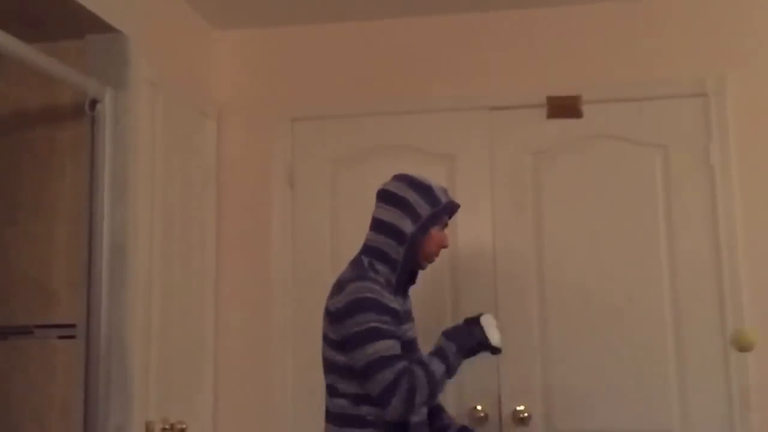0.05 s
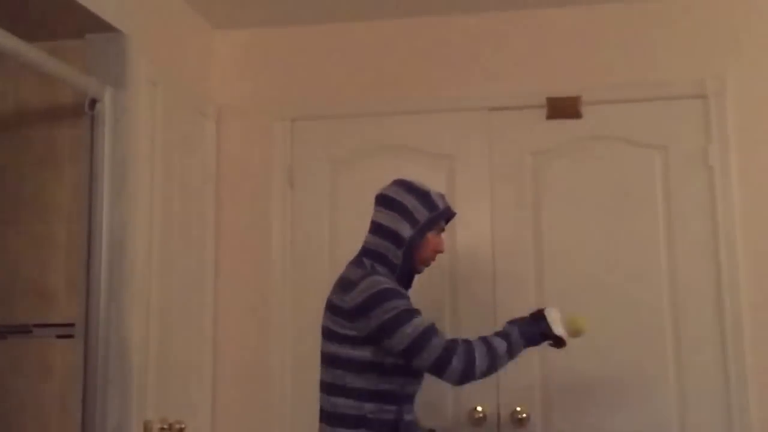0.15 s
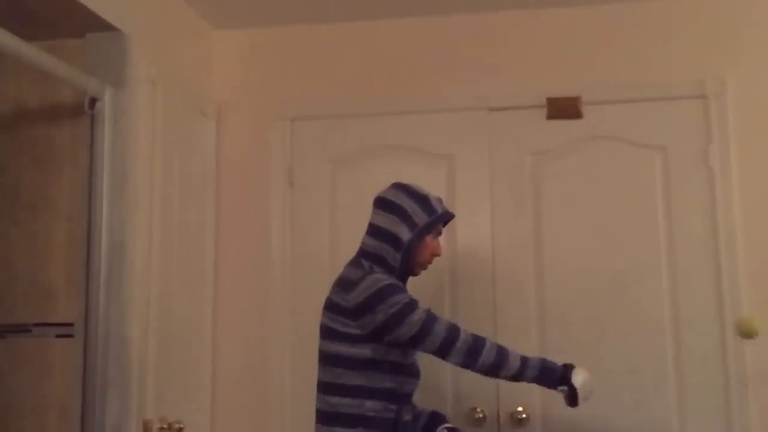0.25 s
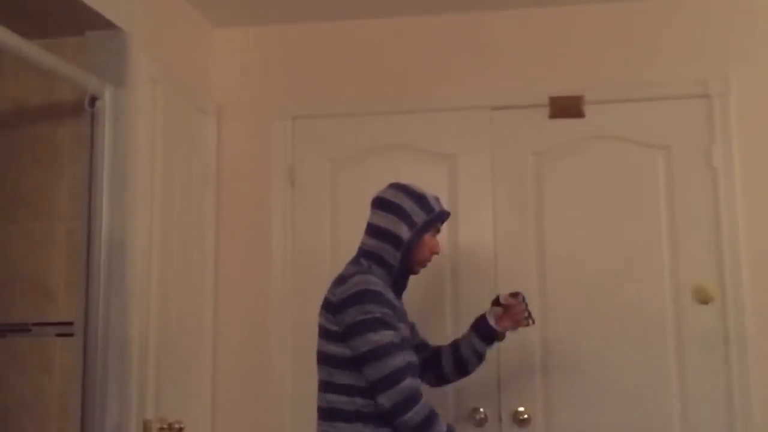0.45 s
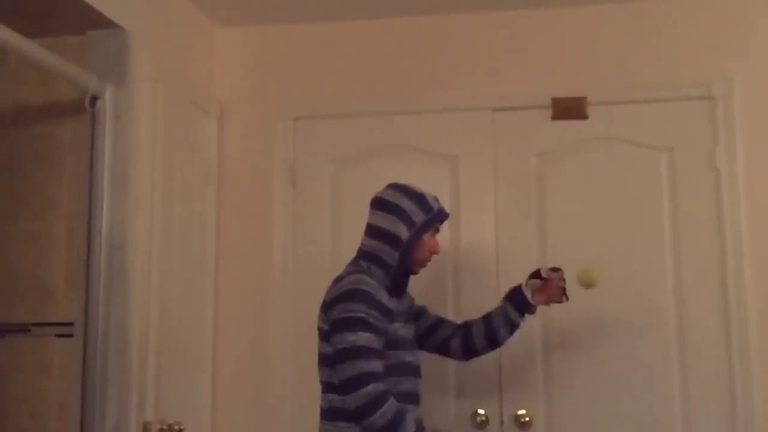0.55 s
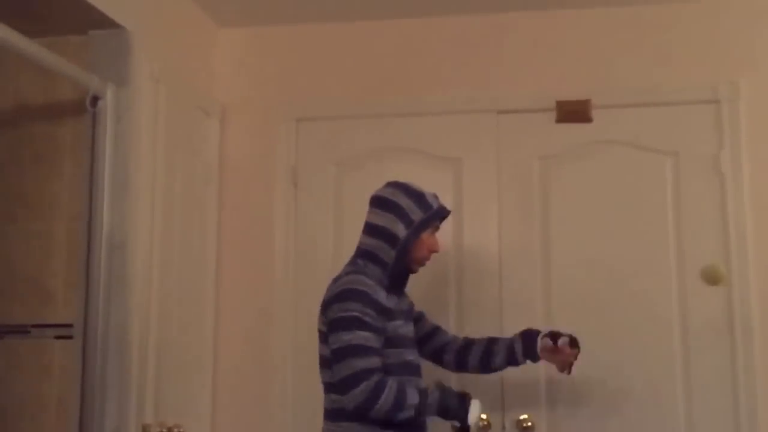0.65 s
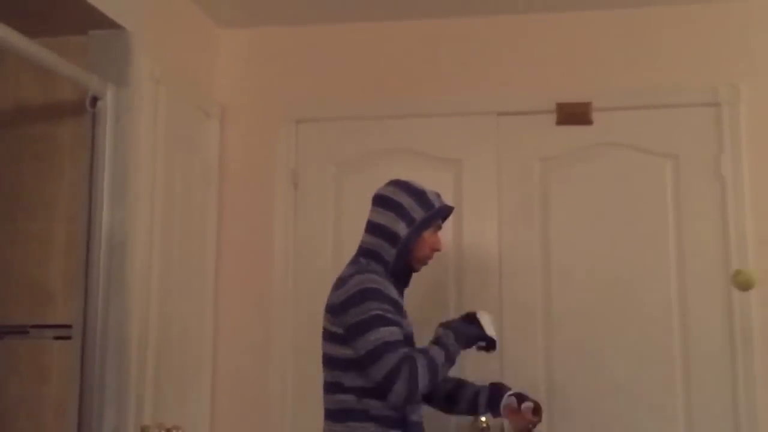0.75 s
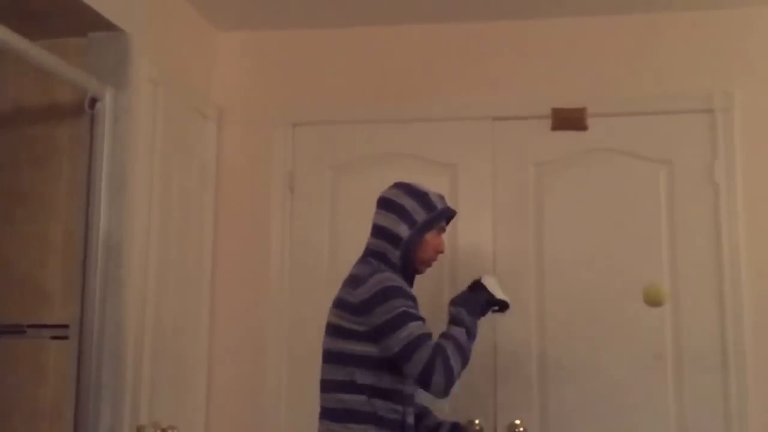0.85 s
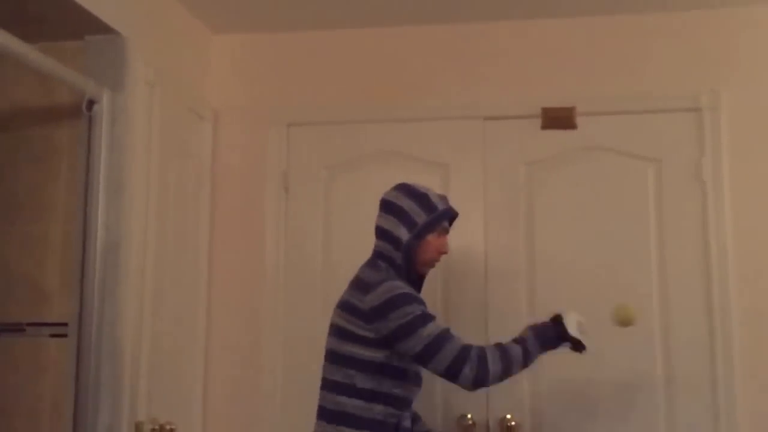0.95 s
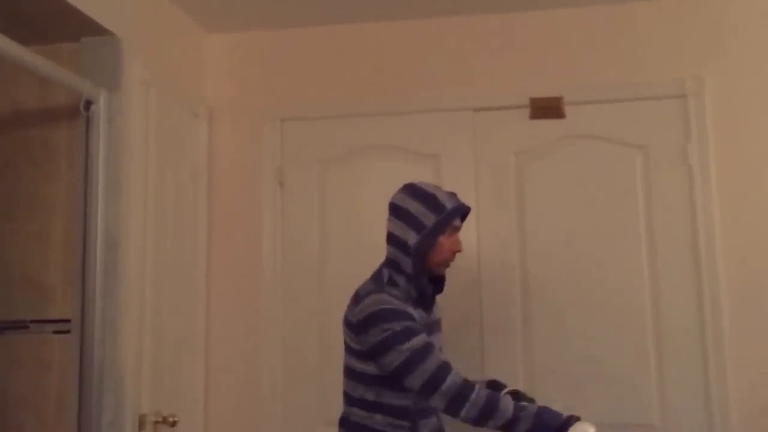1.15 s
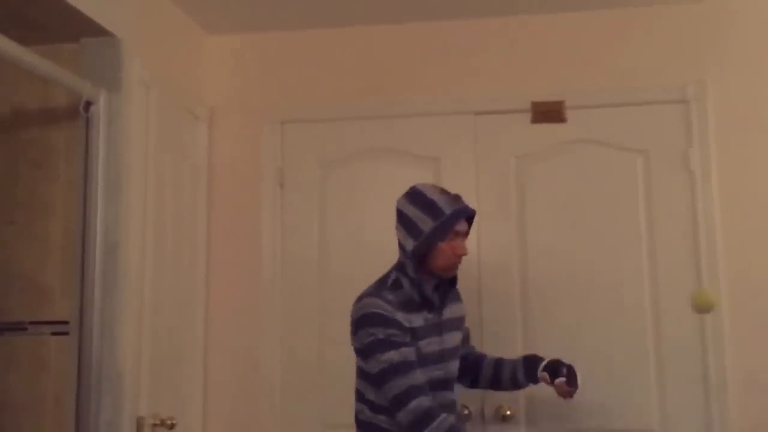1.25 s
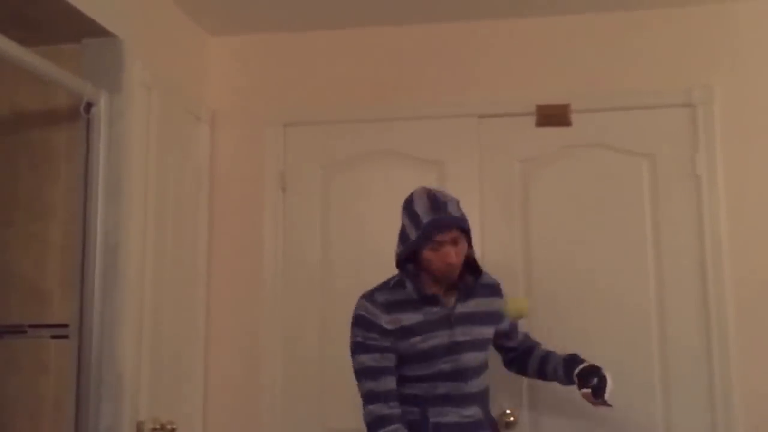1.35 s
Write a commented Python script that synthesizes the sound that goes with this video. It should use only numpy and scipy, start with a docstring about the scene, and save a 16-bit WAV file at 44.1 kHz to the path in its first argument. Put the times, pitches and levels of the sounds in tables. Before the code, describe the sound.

Gloved fists punch a small ball on an elastic cord at about 0.2, 0.6 and 1.0 seconds, the first hit brightest. Each is a leathery slap and dull thump, followed by a short boom and thin ring in a small bare room. The ball swishes faintly near 0.5 and 1.2 seconds. Sleeves rustle very softly, and feet shift around 1.2 seconds over a faint room hum.

```python
"""Gloved fists punch a small ball on an elastic cord, about every 0.4 s, in a small bare room.
Each punch is a leather slap, coloured by the hollow of the glove, and a dead thump from the ball;
it sets the room's low modes booming and leaves a thin ring. Around the punches sleeves rustle,
gloves tick and creak, feet shift and the ball swishes on its cord, over a faint hum of the room."""
import sys
import numpy as np
from scipy import signal
from scipy.fft import rfft, irfft
from scipy.io import wavfile
from scipy.ndimage import uniform_filter1d, map_coordinates

SR = 44100
rng = np.random.default_rng(int(sys.argv[2]) if len(sys.argv) > 2 else 0)


def bounce(signal):
    """Save signal as a 16-bit WAV file at the path given by the first command-line argument."""
    frames = np.transpose(np.atleast_2d(signal))
    limited = np.clip(frames, -1, 1)
    pcm = np.round(limited * 32767).astype(np.int16)
    wavfile.write(sys.argv[1], SR, pcm)


N = 61739
T = np.arange(SR) / SR  # one second for a hit to ring out
HZ = np.fft.rfftfreq(2 * SR, 1 / SR)  # every EQ curve is drawn on this grid

# The blows; the first has already landed and only rings out. Each row: start in seconds, boom gain in dB,
# boom tilt in dB per octave, ring gain in dB, glove cavity in Hz, its gain in dB, then five EQ gains
# in dB for the slap: thud, knock, smack, crack, snap. The thud gain also drives the ball's thump.
PUNCHES = [(-.165, -3, 12, 7, 440, -12.5, 9.5, 10, 1, 5, -1),
           (0.2126, 3, 2.5, 5, 676, 11.5, 6.5, -0.5, -1, 3.5, -0.5),
           (0.5916, -1, -3.5, 5, 956, 2.5, -3, -2, -1.8, -1, -9.5),
           (0.9818, 1.5, -3, 1, 569, 11, 1, 1.5, -1, -4.5, -1)]
# Where thud, knock, smack, crack and snap sit, in Hz.
SLAP_BANDS_HZ = [280, 600, 1200, 3600, 7000]
# The tone of glove on ball. Each row: frequency in Hz, gain in dB.
SLAP_EQ = [(25, -21.5), (60, 3), (150, 14), (260, 12.5), (400, 8), (520, 3.5), (720, 2), (950, 10.5),
           (1200, 15.5), (1650, 9.5), (2250, 9.5), (2900, 0.5), (4200, 0), (5600, -8), (9000, -13.5),
           (15500, -25.5)]
# The ball's dead thump. Each row: pitch in Hz, level in dB, time to fall 60 dB in seconds.
THUMP_MODES = [(200, -26, .04), (370, -28, .035)]
# Tones that ring on after the slap. Each row: pitch in Hz, level in dB, time to fall 60 dB in seconds.
RING_MODES = [(551, -56, .38), (595, -55, .38), (677, -57, .34), (890, -49, .4), (946, -47, .4),
              (1062, -39.5, .47), (1176, -42, .38), (1205, -37, .36), (1240, -43, .38), (1305, -47, .52),
              (1493, -51, .45), (1596, -51, .4), (1712, -50, .35), (2036, -49, .3), (2207, -50, .33),
              (2410, -52, .3)]
# The room's low modes. Each row: pitch in Hz, level in dB, time to fall 60 dB in seconds.
BOOM_MODES = [(54.7, -54.5, 0.51), (79.7, -37.5, 0.248), (93.5, -41, 0.33), (120, -39.5, 0.42),
              (142.06, -32, 0.39), (160.5, -30, 0.41), (186.8, -32.5, 0.45), (206.5, -37, 0.4),
              (242.3, -44.5, 0.37), (289.5, -38, 0.52), (326, -43, 0.46), (363.2, -49.5, .26)]
# The room's reverb time. Each row: frequency in Hz, time to fall 60 dB in seconds.
ROOM_DECAY = [(60, 0.39), (200, 0.57), (550, 0.44), (1200, 0.63), (2200, 0.42), (4000, 0.4), (7000, .31),
              (14000, .25)]
# The room's hum. Each row: frequency in Hz, relative level in dB.
HUM_EQ = [(20, -17), (50, -2), (140, 7), (300, -8), (700, -8), (1200, -32), (2500, -17.5), (6000, -18.5),
          (15500, -27.5)]
# Sleeve moves. Each row: peak time in seconds, width in seconds, level in dB.
RUSTLES = [(.08, 0.071, -65), (0.207, 0.0057, -55), (.9, 0.057, -72.5), (1.384, 0.032, -61)]
# The tone of cloth. Each row: frequency in Hz, relative level in dB.
CLOTH_EQ = [(100, 12), (500, -2), (1500, 0), (3500, -6), (8000, -15), (15000, -11)]
# Glove clicks. Each row: start in seconds, gain in dB, treble tilt in dB per octave, direct sound in dB.
TICKS = [(.055, -32, 1, -12), (.2114, -19, 0, 1), (.2143, -19, 0, -1.5), (.5987, -25, 3.5, -3),
         (.9682, -26, 0, -10), (.9812, -23, 0, -2.5), (.9842, -22, 0, -4), (1.1245, -23.5, 0, -13)]
# The tone of a leather click. Each row: frequency in Hz, gain in dB.
TICK_EQ = [(100, -18), (600, -7), (2000, -2), (6000, -2), (10000, -7), (15500, -11)]
# Shifting feet. Each row: peak time in seconds, width in seconds, level in dB, centre in Hz.
STEPS = [(.12, 0.022, -69, 50.3), (.92, 0.022, -62, 61), (1.15, 0.044, -51.5, 68), (1.2, 0.051, -52, 142)]
# Swings of ball and cord. Each row: peak time in seconds, width in seconds, level in dB, centre in Hz.
SWISHES = [(.478, 0.012, -49, 1435), (.83, 0.013, -92, 1100), (1.205, 0.032, -56.5, 1550),
           (1.293, 0.023, -56.5, 1290)]
# Clenches of the fist. Each row: peak time in seconds, width in seconds, level in dB.
CREAKS = [(0.578, 0.0074, -51), (0.975, 0.006, -46)]
# The tone of rubbing leather. Each row: frequency in Hz, relative level in dB.
CREAK_EQ = [(100, -9), (600, 4), (2200, 5), (4500, -2.5), (7000, -7), (9500, -14.5), (15500, -26)]


def amp(db):
    """Decibels to gain."""
    return 10 ** (np.asarray(db) / 20)


def unit(x):
    """Scale to rms 1."""
    return x / np.sqrt(np.mean(x ** 2) + 1e-20)


def curve(points, hz=HZ):
    """Join (Hz, value) points along a log frequency axis."""
    freqs, values = np.transpose(points)
    return np.interp(np.log(hz + 1), np.log(freqs + 1), values)


def add(track, start_s, sound):
    """Mix a sound into the track; a negative start loses its head."""
    start = round(start_s * SR)
    part = sound[max(-start, 0):max(N - start, 0)]
    track[max(start, 0):][:len(part)] += part


def equalise(x, eq_db):
    """Minimum-phase EQ, so nothing rings ahead of the attack."""
    cepstrum = irfft(np.log(amp(eq_db) + 1e-6))
    cepstrum[1:SR] *= 2
    cepstrum[SR + 1:] = 0
    return irfft(rfft(x, 2 * SR) * np.exp(rfft(cepstrum)))[:len(x)]


def noise(eq_db):
    """Steady noise of rms 1 with the given tone."""
    return unit(irfft(rfft(rng.standard_normal(2 * SR)) * amp(eq_db))[:N])


def swell(peak_s, width_s, db):
    """A bell-shaped fade in and out."""
    return amp(db) * np.exp(-.5 * ((np.arange(N) / SR - peak_s) / width_s) ** 2)


def band_swells(rows, half_width_octaves):
    """Brief swells of noise, each in its own narrow band."""
    out = np.zeros(N)
    for peak_s, width_s, db, centre_hz in rows:
        off_centre = np.log2((HZ + 1) / centre_hz) / half_width_octaves
        out += swell(peak_s, width_s, db) * noise(-10 * np.log10(1 + off_centre ** 4))
    return out


def room_tail(build_s=.0014):
    """Diffuse reverb of energy 1; each frequency dies at its own speed."""
    hz, t, spectrum = signal.stft(rng.standard_normal(SR), SR, nperseg=256)
    t60 = curve(ROOM_DECAY, hz)[:, None]
    tail = signal.istft(spectrum * amp(-60 * t / t60) / np.sqrt(t60), SR)[1][:SR]
    tail *= 1 - np.exp(-T / build_s)
    return tail / np.linalg.norm(tail)


def room(direct_db, bounce_s=.0018, bounce_db=-12.5, walls_db=-13.5, count=12):
    """The room's answer to a click: direct sound, a near bounce, early wall reflections and the tail."""
    path = room_tail()
    path[0] += amp(direct_db)
    path[round(bounce_s * SR)] += amp(bounce_db)
    wall_delays = (rng.uniform(.005, .028, count) * SR).astype(int)
    path[wall_delays] += amp(walls_db) * rng.choice([-1, 1], count) / np.sqrt(count)
    return path


def ringing(modes, rise_s, scatter_db=.8):
    """Damped modes that bloom briefly, each a little different at every blow."""
    hz, db, t60 = np.transpose(modes)[:, :, None]
    level_db = db + scatter_db * rng.standard_normal(db.shape)
    decay = amp(level_db - 60 * T / t60)
    phase = rng.uniform(0, 2 * np.pi, db.shape)
    return (decay * np.sin(2 * np.pi * hz * T + phase)).sum(0) * (1 - np.exp(-T / rise_s))


def slap(bands_db, cavity_hz, cavity_db, cavity_octaves=.12, ripple_db=1.6, ripple_hz=130):
    """Leather smacks the ball and fills the room, coloured by the hollow of the glove."""
    hit = room(direct_db=-17.5)
    colour = curve(list(zip(SLAP_BANDS_HZ, bands_db)))
    cavity = cavity_db / (1 + (np.log2((HZ + 1) / cavity_hz) / cavity_octaves) ** 2)
    # Random peaks and dips, fading out below the smack band, make each slap its own.
    ripple = ripple_db * map_coordinates(rng.standard_normal(1024), [HZ / ripple_hz], mode="mirror")
    ripple *= np.minimum(HZ / SLAP_BANDS_HZ[2], 1) ** 2
    return equalise(hit, curve(SLAP_EQ) + colour + cavity + ripple)


def boom(gain_db, tilt, pivot_hz=164):
    """A blow wakes the room's low modes; an upward tilt favours the higher ones."""
    modes = [(hz, db + gain_db + tilt * np.log2(hz / pivot_hz), t60) for hz, db, t60 in BOOM_MODES]
    return ringing(modes, rise_s=.009)


def punches():
    """Glove meets ball in four layers: slap, the ball's dry thump, a lingering ring and room boom."""
    out = np.zeros(N)
    for start_s, boom_db, boom_tilt, ring_db, cavity_hz, cavity_db, *bands_db in PUNCHES:
        leather = slap(bands_db, cavity_hz, cavity_db)
        thump = amp(bands_db[0]) * ringing(THUMP_MODES, rise_s=.0054)
        ring = amp(ring_db) * ringing(RING_MODES, rise_s=.003)
        add(out, start_s, leather + thump + ring + boom(boom_db, boom_tilt))
    return out


def room_hum(level_db=-69.5):
    """A faint, steady bed of low room noise."""
    return amp(level_db) * noise(curve(HUM_EQ))


def sleeve_rustles():
    """Sleeves brush in soft swells of cloth noise."""
    return sum(swell(*rustle) for rustle in RUSTLES) * noise(curve(CLOTH_EQ))


def glove_ticks(pivot_hz=4000):
    """Thin clicks of leather in the room, most as the glove meets the ball."""
    out = np.zeros(N)
    octaves = np.log2(np.maximum(HZ, 1000) / pivot_hz)  # the tilt levels off below 1 kHz
    for start_s, db, tilt, direct_db in TICKS:
        add(out, start_s, equalise(room(direct_db), db + curve(TICK_EQ) + tilt * octaves))
    return out


def foot_thuds():
    """Shifting weight thuds dully on the floor."""
    return band_swells(STEPS, half_width_octaves=.32)


def ball_swishes(reverb_db=-7):
    """The flying ball and cord whistle softly through the air, with a little room behind them."""
    air = band_swells(SWISHES, half_width_octaves=.23)
    return air + amp(reverb_db) * signal.fftconvolve(air, room_tail())[:N]


def glove_creaks(grain_db=4):
    """Leather gives a short, grainy rub as the fist clenches just before a blow."""
    flutter = unit(uniform_filter1d(rng.standard_normal(N), size=30))
    grain = unit(amp(grain_db * flutter))
    rub = sum(swell(*creak) for creak in CREAKS) * grain * noise(curve(CREAK_EQ))
    return signal.fftconvolve(rub, room(direct_db=-1.5))[:N]


def scene():
    """The mono mix: punches up front, small movements and room hum beneath."""
    gloves_and_ball = punches() + glove_ticks() + glove_creaks() + ball_swishes()
    return (gloves_and_ball + sleeve_rustles() + foot_thuds() + room_hum())[None]


def record(dry, top_hz=15850):
    """A brick-wall low-pass takes off the very top."""
    return irfft(rfft(dry, 2 * SR) * (HZ < top_hz))[:, :N]


dry = scene()
out = record(dry)
bounce(out)
```